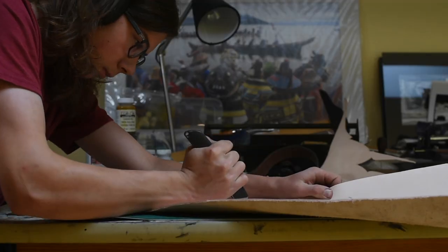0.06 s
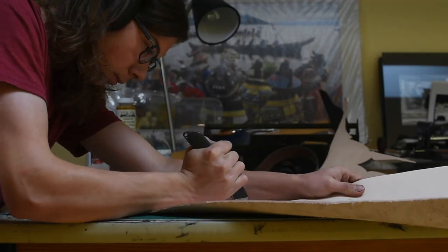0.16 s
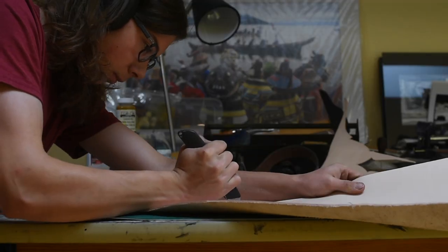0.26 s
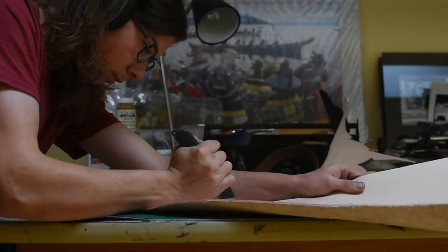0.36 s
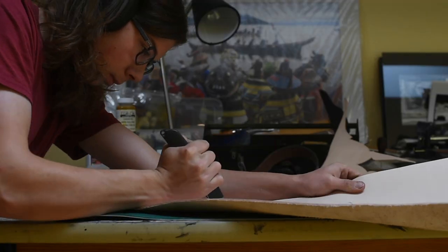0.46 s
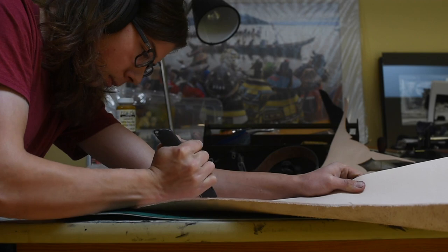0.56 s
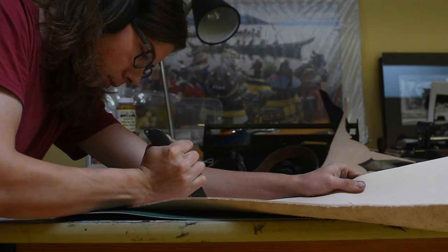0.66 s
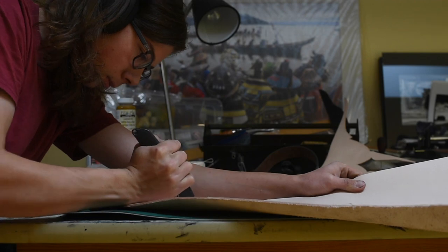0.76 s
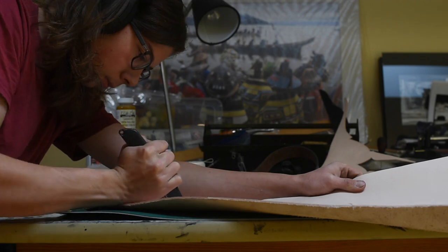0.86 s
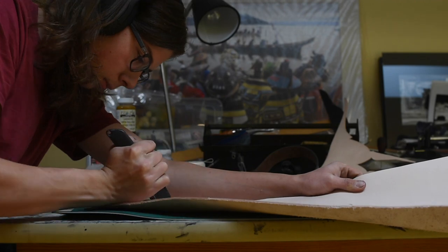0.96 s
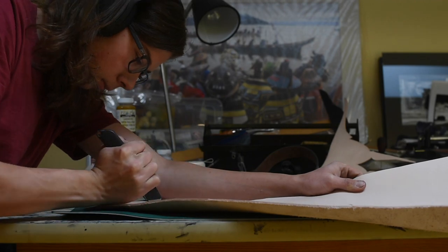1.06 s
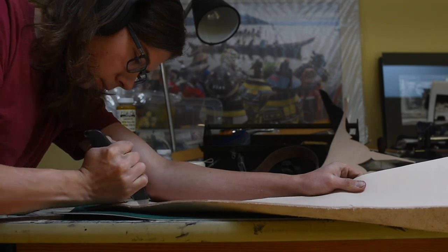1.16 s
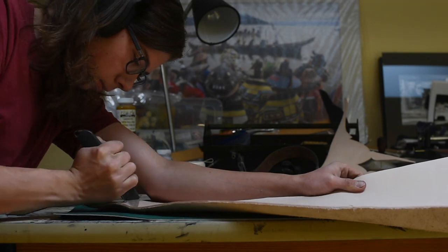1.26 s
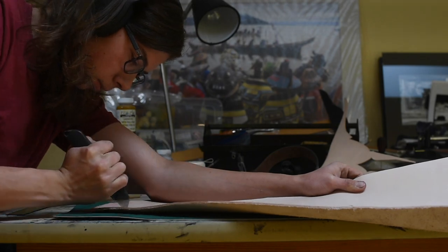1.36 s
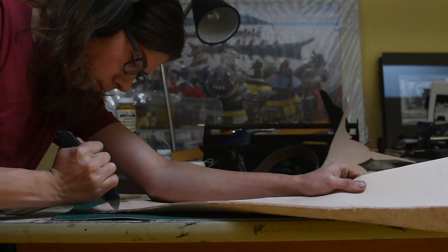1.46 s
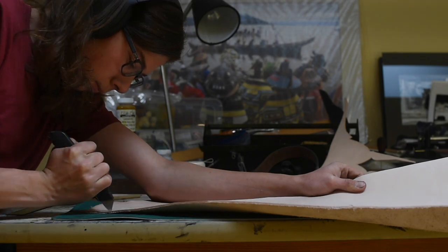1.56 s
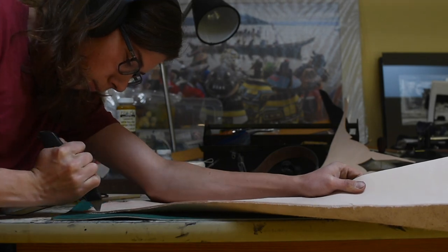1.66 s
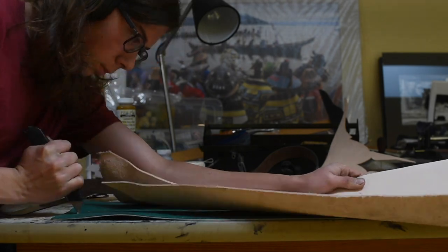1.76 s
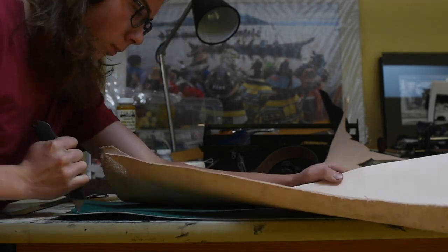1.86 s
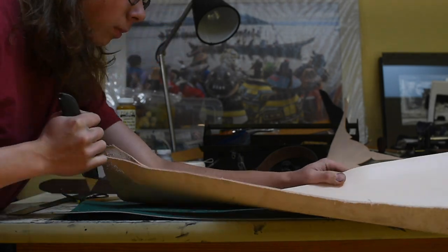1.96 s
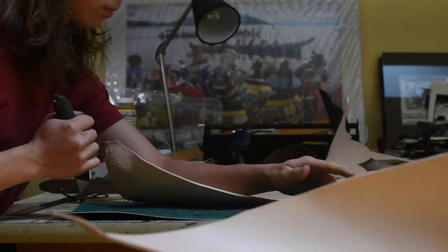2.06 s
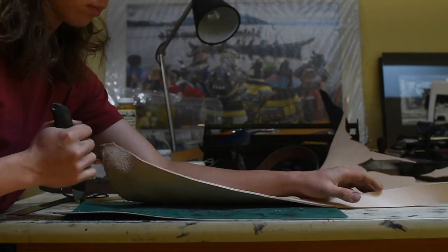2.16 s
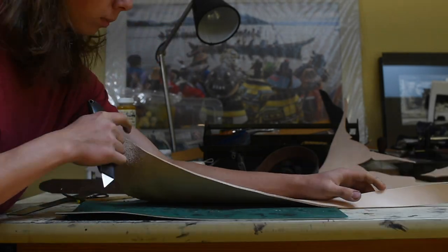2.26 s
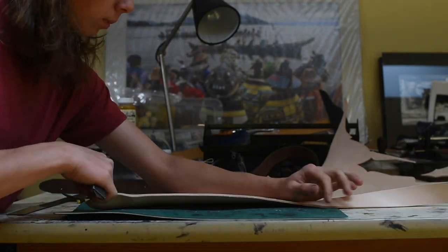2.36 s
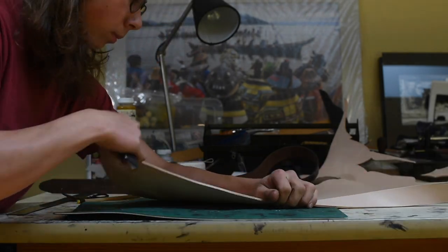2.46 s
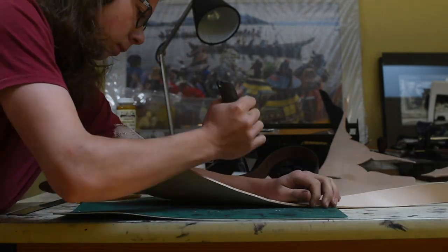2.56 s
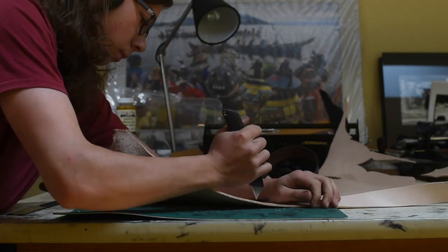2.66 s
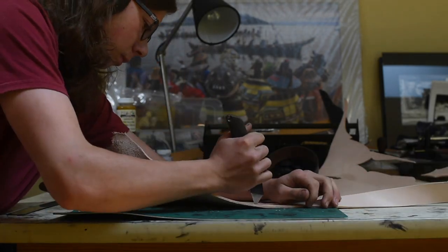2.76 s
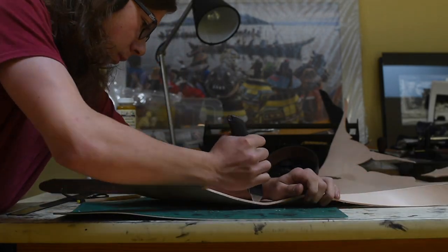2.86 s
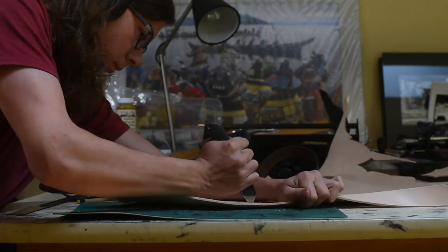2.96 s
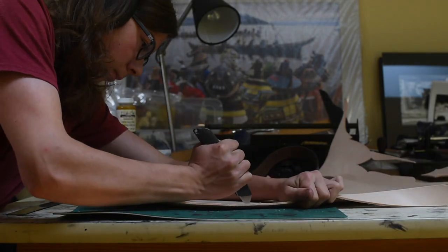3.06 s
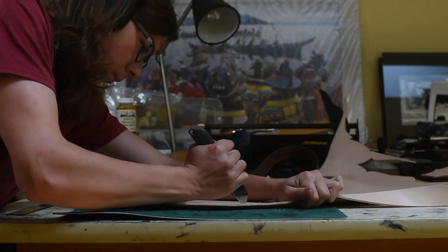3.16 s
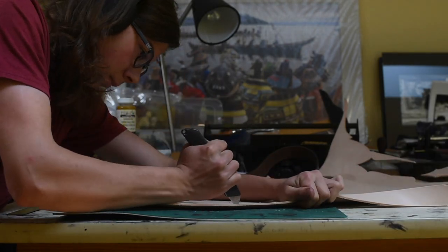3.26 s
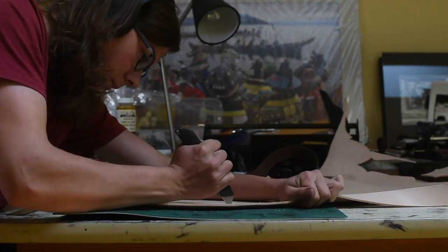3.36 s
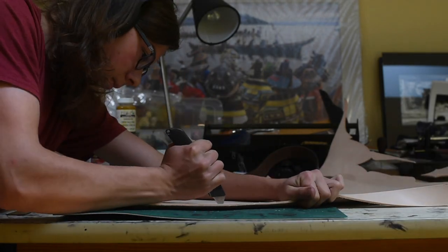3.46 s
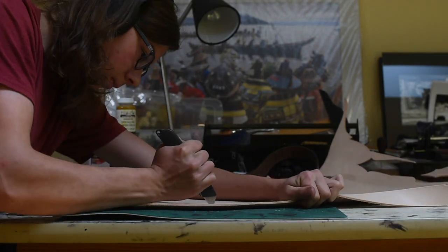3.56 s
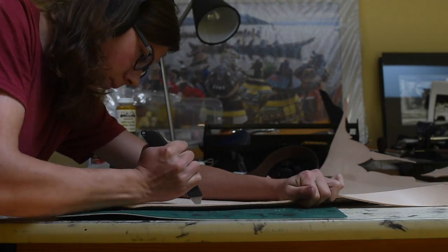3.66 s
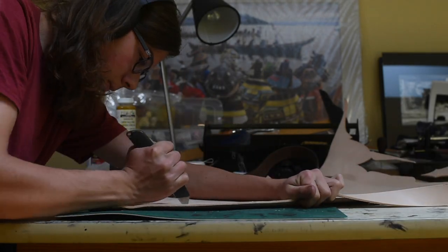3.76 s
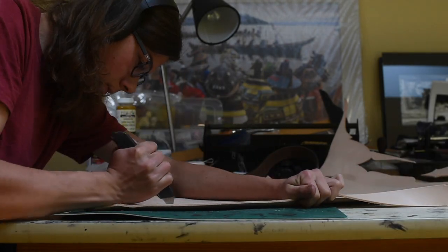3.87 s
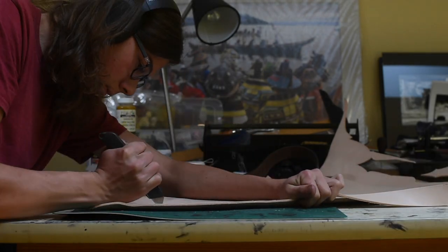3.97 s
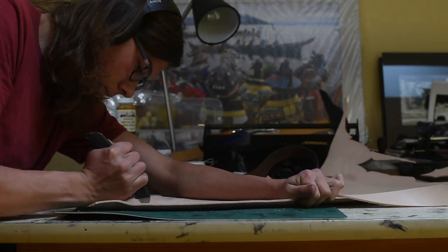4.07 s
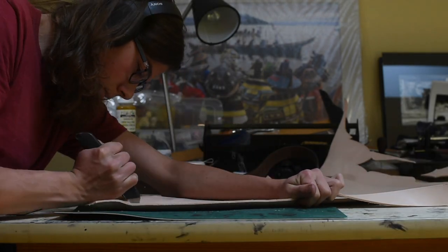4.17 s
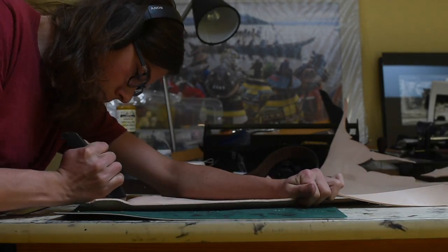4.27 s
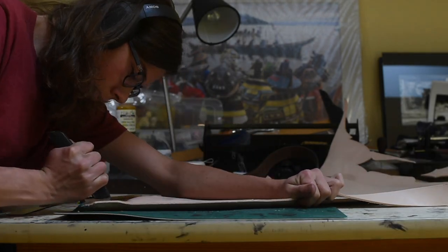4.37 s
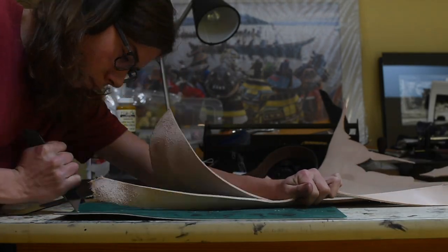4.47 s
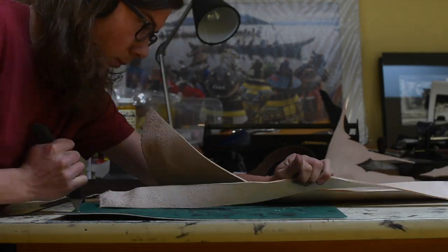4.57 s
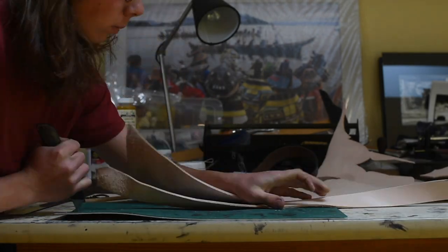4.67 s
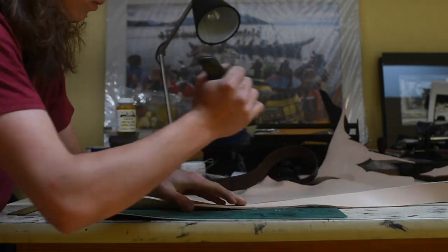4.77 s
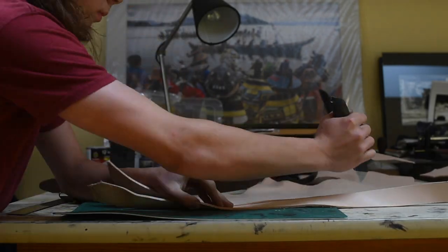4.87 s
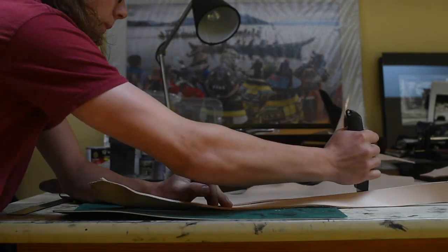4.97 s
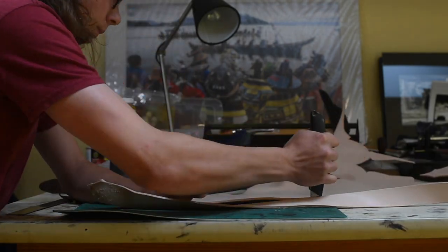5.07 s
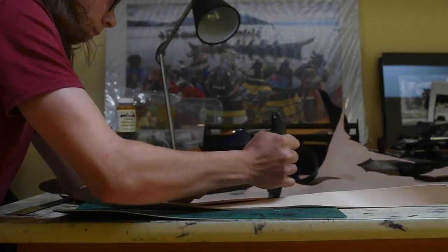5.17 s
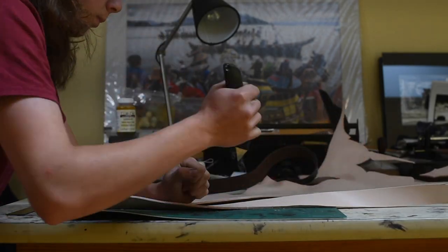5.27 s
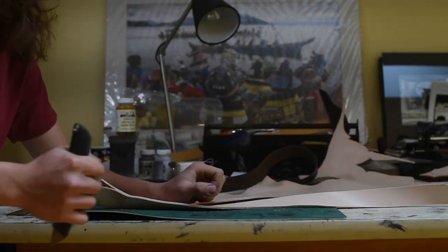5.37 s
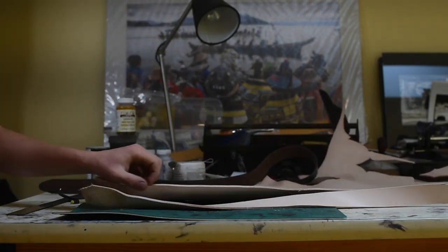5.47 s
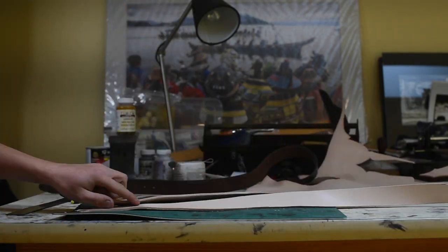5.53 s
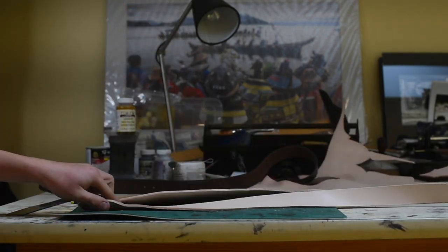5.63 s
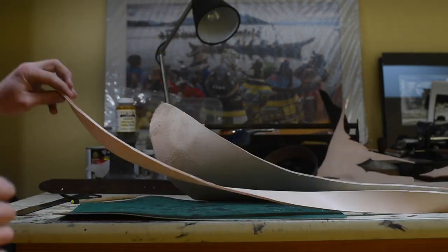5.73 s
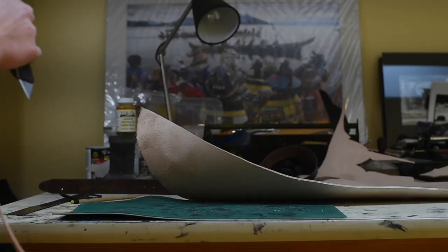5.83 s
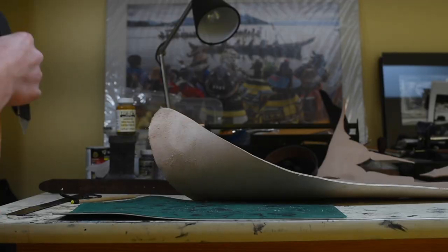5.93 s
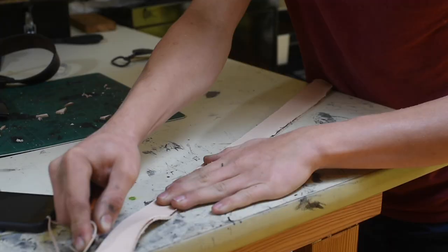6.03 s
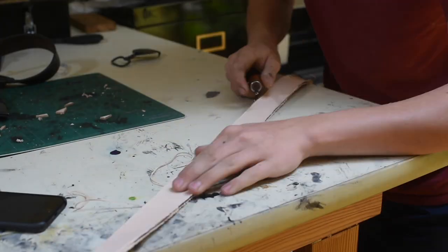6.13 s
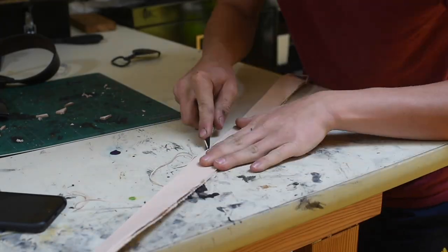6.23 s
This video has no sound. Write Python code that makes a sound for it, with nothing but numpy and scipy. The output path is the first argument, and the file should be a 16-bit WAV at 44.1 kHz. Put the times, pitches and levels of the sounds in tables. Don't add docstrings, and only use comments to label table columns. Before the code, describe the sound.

Two coarse crackling knife cuts through stiff hide, separated by a dropped tool and faint rustles, ending in tiny crisp trimming ticks.

```python
import sys
import numpy as np
from scipy import signal
from scipy.fft import rfft, irfft
from scipy.io import wavfile
from scipy.ndimage import uniform_filter1d

SR = 44100
rng = np.random.default_rng(int(sys.argv[2]) if len(sys.argv) > 2 else 0)


def level_to_linear(level):
    exponent = np.asarray(level, float) / 20
    return 10 ** exponent


def to_wav(sig):
    pcm = np.clip(np.atleast_2d(sig), -1, 1) * 32767
    pcm = np.round(pcm).astype(np.int16)
    wavfile.write(sys.argv[1], SR, pcm.T)


N = 277830
T = np.arange(N) / SR
HZ = np.fft.rfftfreq(N, 1 / SR)
BENCH_TOP_HZ, FIZZ_HZ = 1200, 5000
SCENE_CHANGE_S = 6.115


def read(points, hz):
    f, value = np.transpose(points)
    return np.interp(np.log(hz + 1), np.log(f + 1), value)


def shaped(x, gain):
    return irfft(rfft(x) * gain / np.sqrt(np.mean(abs(gain) ** 2)), N)


def drift(width):
    x = uniform_filter1d(rng.standard_normal(N), int(width))
    x = uniform_filter1d(x, int(width))
    return x / x.std()


def resonate(x, hz, width_hz):
    r = np.exp(-np.pi * width_hz / SR)
    zeros = np.sqrt((1 - r ** 2) / 2) * np.array([1, 0, -1])
    poles = [1, -2 * r * np.cos(2 * np.pi * hz / SR), r ** 2]
    return signal.lfilter(zeros, poles, x)


def room_tone(air, air_db, fan):
    out = level_to_linear(air_db + 0.29 * drift(3000)) * shaped(rng.standard_normal(N), level_to_linear(read(air, HZ)))
    for hz, db, waver_hz in fan:
        turns = np.cumsum(hz + waver_hz * drift(1700)) / SR
        out += np.sqrt(2) * level_to_linear(db + 1.2 * drift(900)) * np.sin(2 * np.pi * turns)
    return out


# frequency in Hz, level in dB per Hz.
AIR_WORKSHOP = [(60, -43), (150, -13), (240, -5), (310, -11), (420, -15.5), (750, -5), (1600, -13.5),
                (6200, -19), (15500, -26)]
AIR_CLOSE = [(15, -53), (25, -26), (641, -11), (1190, -4), (2550, -2), (4740, -6), (5570, -2), (16000, -13)]
# pitch in Hz, level in dB rms, waver in Hz.
FAN_WORKSHOP = [(237, -80.5, 1.7), (258, -82.5, 3), (480.3, -72, .9), (540, -81.5, 2.3), (950, -95, 0.62),
                (356, -86.5, 6)]
FAN_CLOSE = [(1168, -87, .83), (1840, -86, 0.74), (2380, -83, 0.63), (3569, -93, .8)]


def room_tones():
    first = np.clip((SCENE_CHANGE_S - T) / 0.0013, 0, 1)
    wide = room_tone(AIR_WORKSHOP, -70.5, FAN_WORKSHOP)
    close = room_tone(AIR_CLOSE, -76.5, FAN_CLOSE)
    return first * wide + (1 - first) * close


def fibres(snaps_per_s=2500, spread_db=3.5, share=0.48, patchy_db=3.5):
    signs = (rng.random(N) < snaps_per_s / SR) * rng.choice([-1, 1], N)
    snaps = signs * level_to_linear(spread_db * np.minimum(rng.exponential(1, N), 3.2))
    hiss = rng.standard_normal(N) * level_to_linear(2.06 * drift(36))
    mix = np.sqrt(1 - share ** 2) * hiss + share * snaps / snaps.std()
    hz, _, z = signal.stft(mix, SR, nperseg=1024)
    patches = uniform_filter1d(rng.standard_normal(z.shape), size=25, axis=1) * 5
    patches *= np.clip(hz / 1200, 0, 1)[:, None]
    torn = signal.istft(z * level_to_linear(patchy_db * patches), nperseg=1024)[1][:N]
    return torn / torn.std()


def pressure(rows):
    power = np.zeros((3, N))
    for s, db, rise_ms, fall_ms, fizz_db, bench_db in rows:
        near = slice(max(round((s - 0.15) * SR), 0), round((s + 0.24) * SR))
        ms = (T[near] - s) * 1000
        shape_db = -6 * (abs(ms) / np.where(ms < 0, rise_ms, fall_ms)) ** 1.37
        level_db = np.array([[db + bench_db], [db - 7.0], [db + fizz_db]])
        power[:, near] += level_to_linear(shape_db + level_db) ** 2
    return np.sqrt(power)


def friction(rows, colour, rings):
    def below(hz):
        return 1 / (1 + (HZ / hz) ** 6)
    bands = np.sqrt([below(BENCH_TOP_HZ), below(FIZZ_HZ) - below(BENCH_TOP_HZ), 1 - below(FIZZ_HZ)])
    drives = fibres() * pressure(rows)
    out = sum(shaped(drive, band * level_to_linear(read(colour, HZ))) for band, drive in zip(bands, drives))

    load = np.sqrt(abs(uniform_filter1d(np.minimum(drives[1] ** 2, level_to_linear(-106)), 3000)))
    out += level_to_linear(-28.5) * load * resonate(resonate(rng.standard_normal(N), 180, 24.0), 291, 120)

    grain_db = 2.2 * drift(600)
    for k, (hz, width, db, s, reach) in enumerate(rings):
        near = slice(max(round((s - 3 * reach) * SR), 0), round((s + 3 * reach + 0.05) * SR))
        passing_db = -3.7 * ((T[near] - s) / reach) ** 2
        patchy_db = np.roll(grain_db, k * SR // 2)[near]
        drive = drives[int(hz > BENCH_TOP_HZ) + int(hz > FIZZ_HZ), near]
        drive = drive * level_to_linear(db - 3.5 + patchy_db + passing_db)
        out[near] += resonate(drive, hz - 0.34 * width, width)
        out[near] -= resonate(drive, hz + 1.31 * width, width)
    return out


def slips(rows, bite):
    s, db, rise_ms, fall_ms = np.transpose(rows)
    speed_db = np.interp(s, *np.transpose(bite))
    doublings = np.log2((rise_ms + fall_ms) / 30)
    over_db = db - np.median(db)
    fizz_db = -5.5 + speed_db - 0.059 * over_db + 2 * doublings
    bench_db = -8.5 + speed_db - 0.46 * over_db + 2.5 * doublings
    return np.transpose([s, db, rise_ms, fall_ms, fizz_db, bench_db])


def catches(rows):
    crest_db, rise_ms = 16, 2.2
    return [(s, peak_db - crest_db, rise_ms, fall_ms) for s, peak_db, fall_ms in rows]


# time in seconds, level in dB, rise in ms, fall in ms.
SCRATCH_SLIPS = [
    (.005, -64, 2.6, 21),
    (.104, -45.5, 9.4, 15),
    (.183, -51.5, 6, 31),
]
CUT_1_SLIPS = [(0.306, -49, 13.4, 43), (.388, -54.5, 26, 12), (0.442, -53, 4.6, 6.6), (.507, -50.5, 29, 19),
               (0.537, -50, 7.4, 7.7), (0.581, -49, 10.7, 4.5), (0.604, -50, 12, 14),
               (0.675, -46.5, 6, 20.6), (.748, -46.5, 10, 4.7), (0.788, -50, 65, 7), (0.842, -38.5, 10, 14),
               (0.904, -49, 6, 58), (0.945, -56, 110, 16), (0.97, -45, 2.6, 8.1), (1.011, -48.5, 17, 62),
               (1.08, -46.5, 4.3, 26.6), (1.185, -49.5, 13.4, 52), (1.271, -53.5, 6.9, 27),
               (1.336, -50.5, 29, 12), (1.36, -50.5, 10, 20), (1.396, -49, 6.4, 16.5), (1.442, -51, 12, 10),
               (1.465, -47, 4, 4.7), (1.493, -49, 16, 19), (1.528, -52.5, 3.6, 13),
               (1.581, -43.5, 4.1, 9.5), (1.629, -50.5, 34, 6.2), (1.7, -48, 21.4, 48),
               (1.773, -36, 9.3, 8.8)]
# time in seconds, peak in dB, fall in ms.
CUT_1_CATCHES = [(0.2922, -43, 12), (0.4309, -47, 9.1), (0.448, -39, 7.5), (0.4734, -34.5, 11),
                 (0.5724, -44, 11), (0.649, -41.5, 10), (0.6614, -34.5, 12), (0.7272, -33, 10),
                 (0.826, -30, 13), (0.8954, -33, 9), (1.1684, -37.5, 11), (1.2672, -41, 8),
                 (1.3065, -34, 10), (1.381, -32.5, 9.3), (1.487, -31, 15), (1.6496, -35, 8.9)]
# time in seconds, lift of fizz and
# bench in dB.
CUT_1_BITE = [(.1, 4), (.19, -9.5), (.45, 4.5), (.85, 1.5), (1.2, 2), (1.5, 1), (1.63, -2), (1.77, -2.5)]
# frequency in Hz, level in dB per Hz.
CUT_1_COLOUR = [(180, -54), (300, -27.5), (756, -12), (1330, -16.5), (1600, -1), (2250, -2.5), (8000, -13),
                (15500, -18.5)]
# pitch in Hz, width in Hz, level in dB, centre in s, reach in s.
CUT_1_RINGS = [(2200, 150, 9.5, 0.089, 0.021), (2190, 140, 0, 0.34, 0.056), (4980, 580, 3, 0.37, 0.06),
               (3640, 137, 8, 0.6, 0.21), (3450, 180, 1.5, 0.1, 0.08), (2030, 120, 6.5, 0.51, 0.048),
               (4600, 110, 2, 0.73, 0.029), (1620, 90, 9.5, 0.54, 0.045), (1700, 72, 1, 1.185, 0.13),
               (1696, 71, 0, 1.3, 0.09), (12500, 1100, -3.5, 1.36, 0.046), (6460, 460, -8, 1.3, .04),
               (2420, 360, -5, 1.32, 0.052), (1690, 90, 4, 1.606, 0.077), (900, 92, -6.5, 0.25, 0.48),
               (770, 33, -2.5, 1.43, 0.16), (2814, 170, 2.5, 1.13, 0.15), (3730, 72, -4.5, 1.28, 0.13),
               (6900, 490, -3.5, 0.51, 0.034), (1660, 150, -6, 0.84, 0.051)]


def first_cut():
    rows = [*SCRATCH_SLIPS, *CUT_1_SLIPS, *catches(CUT_1_CATCHES)]
    return friction(slips(rows, CUT_1_BITE), CUT_1_COLOUR, CUT_1_RINGS)


# time in seconds, level in dB, fall in ms, fizz in dB, bench in dB.
TICKS = [(1.564, -47, 4.4, -9, -11), (1.843, -60, 21, -9, -11), (1.902, -58, 8.3, -17, -18),
         (1.92, -66.5, 6, 8, -15), (2.395, -58, 10, -19, -13), (2.693, -67.5, 10, -3, -20),
         (2.041, -58, 24, -22, -2), (2.098, -68, 20, 5, -1), (2.417, -58, 9.5, -33, -7),
         (2.469, -52, 7.4, -5.5, -20), (2.798, -63.5, 5, -7, -19), (2.847, -61, 18, -7, -33),
         (2.906, -63.5, 16, -3, -5), (2.927, -68.5, 6.5, 5.5, 3.5), (2.939, -69, 6.4, 3, 4),
         (4.707, -55.5, 14, -13, -5.5), (4.729, -59, 8, -5, -7), (4.887, -60, 11, -1.5, -7),
         (4.927, -66.5, 14, 10.5, 10.5), (4.973, -60, 13, -20, 2.5), (5.007, -70, 4, 4, -10),
         (5.034, -73.5, 17, 8.5, -1), (5.4, -70, 6.7, 3, -13), (5.103, -55.5, 9, -10.5, 2),
         (5.136, -60, 18, 1, -10), (5.2505, -52, 2, 3, -8), (5.377, -70, 5.9, 4, 2),
         (5.43, -55.5, 17, -2, -4), (5.564, -59.5, 19, -8.5, -4), (5.726, -63.5, 30, 4, -20),
         (5.772, -55, 10, 0, -1), (5.853, -67, 11, -3, 4.5), (5.9996, -54, 4.4, -2.5, -5)]
# time in seconds, level in dB, half length in ms, fizz in dB, bench in dB.
SOFT_RUBS = [(1.922, -59, 28, -13, -17), (2.144, -50, 10, -16, -31), (2.343, -49, 8.8, -15, -2.5),
             (2.486, -51, 10.6, -8, -11), (2.4, -73, 50, 2.5, -13.5), (2.59, -68.5, 47, -3.5, -24),
             (3.03, -74, 52, 1.5, -12), (4.65, -73.5, 28, 2, -13), (4.765, -73, 35, 7.5, -14),
             (4.849, -44, 8.2, -4, -8.5), (5.18, -60, 26, 3, -10), (5.216, -53.5, 11, 4, -8),
             (5.258, -53, 19.4, 1, -1.5), (5.32, -69.5, 19, -1, -5), (5.45, -58.5, 9.1, 3.5, 3),
             (5.523, -59.5, 11, -10, -2.5), (5.68, -78.5, 89, 2, 5), (5.815, -73, 28, 4.5, -14),
             (5.882, -66.5, 12, -3, 4.5), (5.996, -68, 5.3, -6, -5.5)]
# frequency in Hz, level in dB per Hz.
RUSTLE_COLOUR = [(76, -42), (130, -27), (237, -19), (375, -8.5), (942, -1.5), (3390, 3), (15500, -13.5)]
# pitch in Hz, width in Hz, level in dB, centre in s, reach in s.
RUSTLE_RINGS = [(2150, 350, 6, 2.14, 0.023), (3500, 240, 10.5, 5.255, 0.023), (2350, 110, 8, 5.447, .015),
                (5570, 240, 4.4, 5.436, 0.011), (6050, 290, 3.7, 5.46, .01), (7800, 500, 1, 5.27, 0.012),
                (6500, 470, 3.6, 2.93, 0.008), (3950, 500, 5.3, 2.87, 0.065),
                (13100, 450, 1, 5.155, 0.0053), (8860, 51, -2, 4.663, .015), (4390, 60, 0, 5.1, .04),
                (4300, 140, -5, 4.78, 0.029), (4230, 300, 0.5, 2.34, .01), (3500, 330, 1, 2.1, 0.013),
                (1950, 810, 9.3, 2.422, 0.0068), (900, 80, 3, 2.93, 0.042), (1083, 150, 4, 5.82, 0.089),
                (2330, 470, 11.5, 6.0, 0.016)]


def handling():
    ticks = [(s, db, 0.84, fall_ms, *levels) for s, db, fall_ms, *levels in TICKS]
    rubs = [(s, db, half_ms, half_ms, *levels) for s, db, half_ms, *levels in SOFT_RUBS]
    return friction(ticks + rubs, RUSTLE_COLOUR, RUSTLE_RINGS)


# time in seconds, level in dB, pitch in Hz, T60 in s.
PUSHES = [(1.772, -19.5, 2640, 0.0065), (1.7715, -28.5, 3500, .006), (4.602, -64, 1010, 0.04),
          (5.772, -53, 1050, .02), (1.775, -28, 2050, 0.012), (2.219, -51, 166, 0.22),
          (2.2187, -21.5, 1500, .012), (2.219, -28, 2500, .012), (2.2298, -20, 4300, 0.0064),
          (2.2321, -14, 5820, 0.019), (2.2308, -17, 6250, 0.016), (2.2308, -20, 7170, 0.024),
          (2.3058, -23, 830, 0.022), (2.3065, -31, 1900, .008), (4.9258, -46, 8550, .006),
          (4.9256, -47, 4800, .01), (2.308, -41.5, 189, 0.098), (2.324, -56.5, 86.5, 0.21),
          (4.831, -43.5, 256, 0.12), (4.834, -51, 300, 0.075), (4.83, -46, 450, 0.039),
          (5.103, -50, 960, 0.037), (5.244, -46, 241, 0.048), (5.246, -53.5, 350, .04),
          (5.432, -54.5, 1001, 0.15), (5.497, -63, 980, 0.1), (5.563, -52, 1004, 0.09),
          (5.618, -56, 1100, .05), (5.108, -47.5, 896, 0.05), (5.677, -54, 618, 0.049),
          (5.68, -60, 70.2, 0.17), (5.993, -52, 439, 0.026), (5.9987, -36, 2500, 0.0062),
          (6.005, -41.5, 2290, 0.0095)]
# time in seconds, level in dB, pitch in Hz, T60 in s.
TOOL_SHIMMER = [(2.2308, -64, 9044, .65), (2.2308, -68, 9066, .5), (2.2308, -56, 7695, .45),
                (2.2308, -50, 4355, .25), (2.2308, -58, 7715, .45), (2.2308, -53, 6551, .45),
                (2.2308, -63, 7262, .34), (2.2308, -42, 3528, .27)]


def thumps():
    out, t = np.zeros(N), T[:SR // 2]
    for s, db, hz, t60 in [*PUSHES, *TOOL_SHIMMER]:
        onset = 1 - np.exp(-4 * hz * t)
        swing = level_to_linear(db - 60 * t / t60) * onset * np.sin(2 * np.pi * hz * t)
        part = out[round(s * SR):][:len(t)]
        part += swing[:len(part)]
    return out


def struck(contacts, colour, modes, ring_db=-7.5):
    burst, clicks = np.zeros(N), np.zeros(N)
    for s, db, ms in contacts:
        burst += level_to_linear(db - 7.0 * np.maximum(T - s, 0) * 1000 / ms) * (T > s)
        clicks[round(s * SR)] = level_to_linear(db)
    t = T[:SR // 2]
    ring = sum(level_to_linear(db - 60 * t / t60) * np.sin(2 * np.pi * hz * t) for hz, db, t60 in modes)
    ring *= 1 - np.exp(-t / 0.0004)
    rattle = shaped(burst * rng.standard_normal(N), level_to_linear(read(colour, HZ)))
    rattle = rattle * np.clip((T - contacts[0][0]) / 0.001, 0, 1)
    return rattle + level_to_linear(ring_db) * signal.fftconvolve(clicks, ring)[:N]


# time in seconds, blow in dB, burst in ms.
DROP_CONTACTS = [
    (2.2185, -24, 12.5),
    (2.2255, -32.5, 4),
    (2.2308, -19, 1.3),
    (2.236, -26, 6.5),
    (2.243, -38.5, 6.8),
]
KNOCK_CONTACTS = [
    (2.3062, -23, 4),
    (2.311, -30.5, 6),
]
# frequency in Hz, level in dB per Hz.
DROP_RATTLE = [(120, -56.5), (200, -25.5), (596, -11.5), (974, -8), (3300, -5), (3820, -14.5), (6020, -11),
               (7760, -15), (15500, -20)]
KNOCK_RATTLE = [(88, -61), (150, -39), (750, 2.5), (1050, -8.5), (1910, -2.5), (3000, -23.5), (4800, -35),
                (15500, -48)]
# pitch in Hz, level in dB, T60 in s.
STEEL_MODES = [(627, -2.5, 0.051), (800, -5, .06), (1610, -15.5, .12), (1900, -14.5, 0.16),
               (2680, -14, 0.11), (3180, -9.5, 0.065), (3420, -14, .08), (4654, -5.5, 0.11),
               (5330, -14, .06), (7090, -6.5, 0.061), (4300, -11, .05), (10900, -5, .06)]
BENCH_MODES = [(632, -7, 0.073), (1130, -8.5, 0.14), (1990, -8.5, .09), (2186, -13, .07), (1583, 11, 0.021),
               (1810, -27.5, 0.21), (2007, 14, 0.013), (2370, 7.5, 0.035), (3130, -19, 0.15),
               (2700, -20, 0.12), (4220, -25, 0.101)]


def dropped_tool():
    bounces = struck(DROP_CONTACTS, DROP_RATTLE, STEEL_MODES)
    return bounces + struck(KNOCK_CONTACTS, KNOCK_RATTLE, BENCH_MODES)


# time in seconds, level in dB, rise in ms, fall in ms.
CUT_2_SLIPS = [(3.151, -53, 17, 13), (3.205, -55.5, 20, 17), (3.235, -53.5, 9.6, 9.7),
               (3.319, -48.5, 22.5, 19.6), (3.354, -55, 5, 12), (3.39, -56, 6, 8.1),
               (3.435, -49.5, 15.5, 7.1), (3.465, -47, 21, 15), (3.508, -48, 10, 17),
               (3.559, -48.5, 15, 5.9), (3.607, -47, 29, 11), (3.653, -51.5, 9.8, 35),
               (3.719, -45, 28, 11.6), (3.78, -44, 26, 12), (3.825, -50.5, 23, 30), (3.872, -47, 7, 54),
               (3.987, -45.5, 11.6, 12), (4.02, -53, 5, 18), (4.08, -49, 23, 5.6), (4.115, -48, 23, 14.6),
               (4.152, -50, 10, 18), (4.187, -51, 14, 20), (4.214, -52, 13, 17), (4.264, -47, 7.1, 17),
               (4.326, -48.5, 24, 25), (4.381, -41, 8.4, 11.6), (4.426, -44.5, 11, 15),
               (4.46, -42.5, 2.9, 15), (4.506, -40.5, 19, 13.5)]
# time in seconds, peak in dB, fall in ms.
CUT_2_CATCHES = [(3.1353, -43.5, 12), (3.2797, -37.5, 14), (3.4186, -35, 12), (3.4994, -36, 12),
                 (3.5897, -41, 12), (3.6436, -29, 8.6), (3.714, -29, 7.1), (3.8621, -30.5, 12),
                 (3.98, -41, 15), (4.0158, -39, 9.4), (4.0567, -41, 8.5), (4.2574, -32, 16),
                 (4.367, -30.5, 12), (4.4546, -32, 7.1), (4.5045, -30, 3.7), (4.5175, -27, 3)]
# time in seconds, lift of fizz and
# bench in dB.
CUT_2_BITE = [(3.15, -10), (3.21, -15), (3.3, -3.5), (3.6, 0), (4.1, 2), (4.5, 2)]
# frequency in Hz, level in dB per Hz.
CUT_2_COLOUR = [(180, -24), (300, -8), (411, -18), (756, 1), (1030, -6.5), (2040, 0.5), (7000, -1.5),
                (15500, -3)]
# pitch in Hz, width in Hz, level in dB, centre in s, reach in s.
CUT_2_RINGS = [(1635, 70, -6, 3.29, 0.1), (2850, 32, -1, 3.8, 0.23), (3030, 110, -4, 3.74, 0.053),
               (3070, 65, 3.5, 3.9, 0.082), (2090, 110, -5, 3.67, 0.31), (780, 81, -16, 3.85, 0.78),
               (700, 93, -8, 4.5, 0.15), (6570, 130, -3, 3.72, 0.085), (10300, 460, 9, 4.07, 0.013),
               (1010, 42, -2, 4.23, 0.21), (1890, 160, 4.5, 4.16, 0.074), (1670, 21, -1, 4.25, 0.11),
               (4000, 200, 3.5, 4.37, 0.071), (5580, 320, 3, 4.47, 0.021), (6250, 400, 5, 4.8, .012)]


def second_cut():
    rows = [*CUT_2_SLIPS, *catches(CUT_2_CATCHES)]
    return friction(slips(rows, CUT_2_BITE), CUT_2_COLOUR, CUT_2_RINGS)


# time in seconds, level in dB, rise in ms, fall in ms.
TRIM_SLIPS = [(6.113, -63, 3.3, 4.9), (6.1388, -54.5, 0.3, 2.2), (6.159, -70, 1, 8),
              (6.176, -66.5, 10, 7.9), (6.196, -61, 0.6, 3), (6.202, -65, .6, 2.1), (6.213, -73, .7, 6),
              (6.2437, -55.5, 0.3, 2.3), (6.2675, -69, 0.4, 2), (6.299, -61.5, 6.6, 10)]
# time in seconds, lift of fizz and bench in dB.
TRIM_BITE = [(6.11, 5.5), (6.3, 10)]
# frequency in Hz, level in dB per Hz.
TRIM_COLOUR = [(120, -56), (700, -46.5), (2330, -31), (3960, -14), (4660, -14), (15500, 4)]
# pitch in Hz, width in Hz, level in dB, centre in s, reach in s.
TRIM_RINGS = [(4880, 400, 9.4, 6.14, 0.0084), (6600, 900, 6.8, 6.14, 0.0086), (8600, 400, 6, 6.215, 0.0091),
              (6000, 340, 1, 6.113, .006), (4800, 270, 3, 6.22, 0.055), (12000, 2500, 5.6, 6.245, .01)]


def trimming():
    return friction(slips(TRIM_SLIPS, TRIM_BITE), TRIM_COLOUR, TRIM_RINGS)


def workshop(x, t60=0.11, wet_db=-12):
    t = T[:SR // 4]
    echoes = (rng.random(len(t)) < 0.05) * rng.choice([-1, 1], len(t))
    taps = echoes * level_to_linear(-60 * t / t60) * (t > 0.004)
    return x + level_to_linear(wet_db) * signal.fftconvolve(x, taps / np.linalg.norm(taps))[:N]


def scene():
    bench = first_cut() + handling() + thumps() + dropped_tool() + second_cut()
    return (workshop(bench) + trimming() + room_tones())[None]


def top_cut(x):
    return signal.sosfilt(signal.butter(12, 16480, fs=SR, output="sos"), x)


def record(dry):
    bass_cut = signal.butter(2, 110, "highpass", fs=SR, output="sos")
    rumble = level_to_linear(-92.5) * shaped(rng.standard_normal(N), HZ ** 2 / (1 + (HZ / 75) ** 4))
    edge = signal.firwin(1201, 15760, window=("kaiser", 7), fs=SR)
    heard = signal.oaconvolve(signal.sosfilt(bass_cut, dry) + rumble, edge[None], "same")
    return top_cut(heard)


dry = scene()
out = record(dry)
to_wav(out)
```